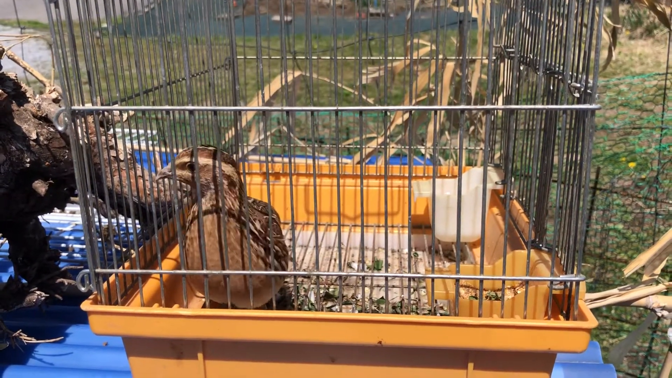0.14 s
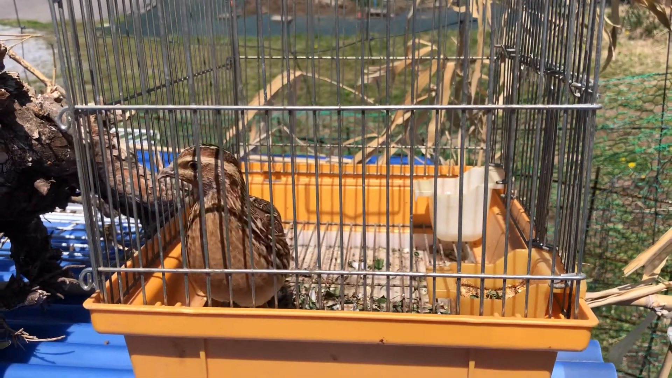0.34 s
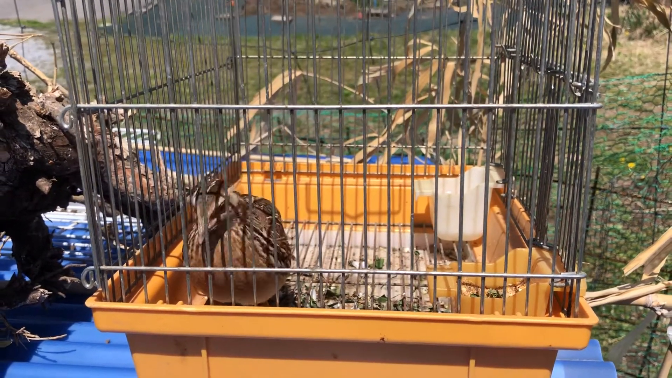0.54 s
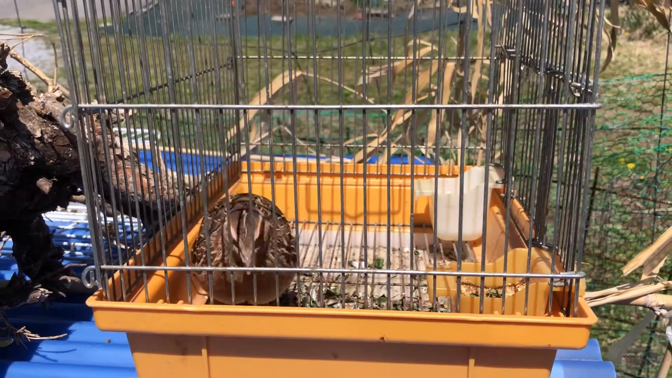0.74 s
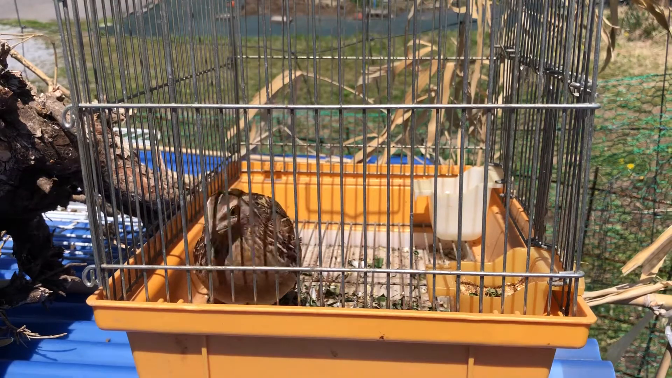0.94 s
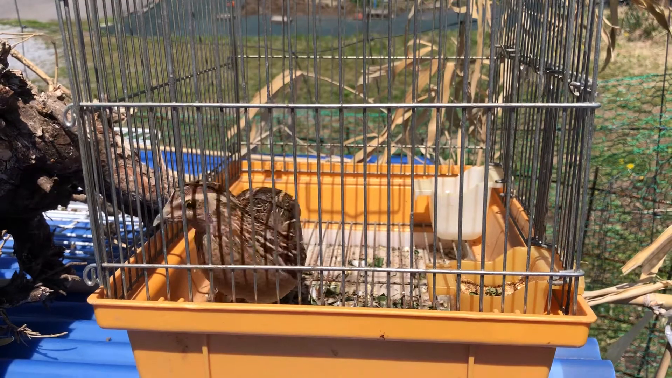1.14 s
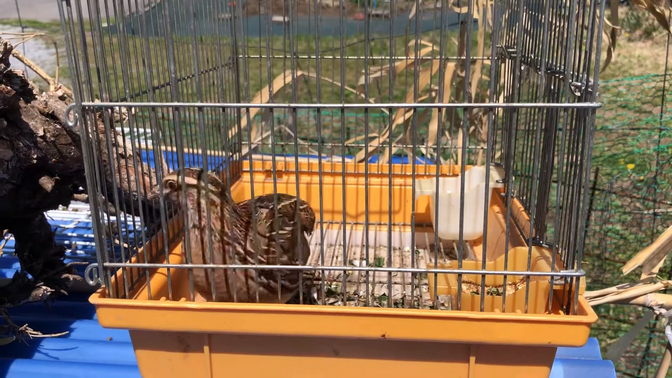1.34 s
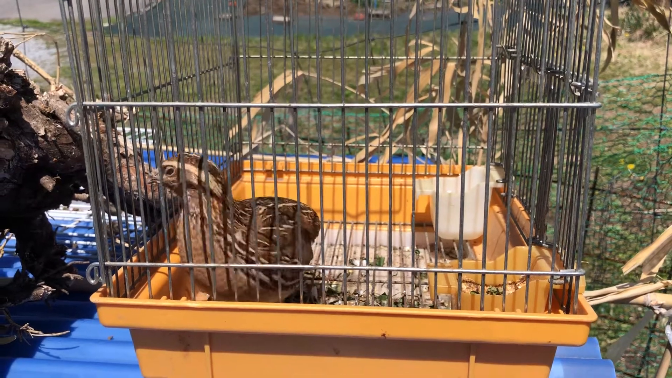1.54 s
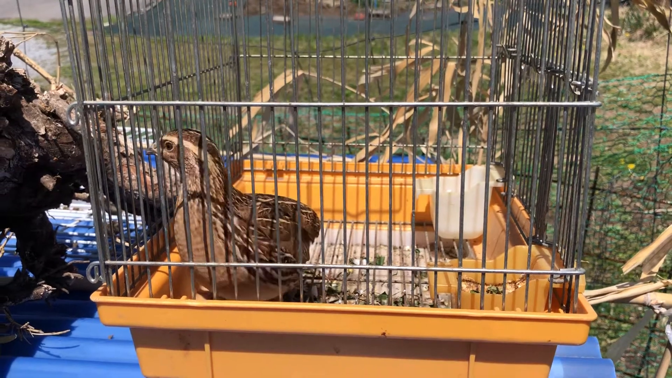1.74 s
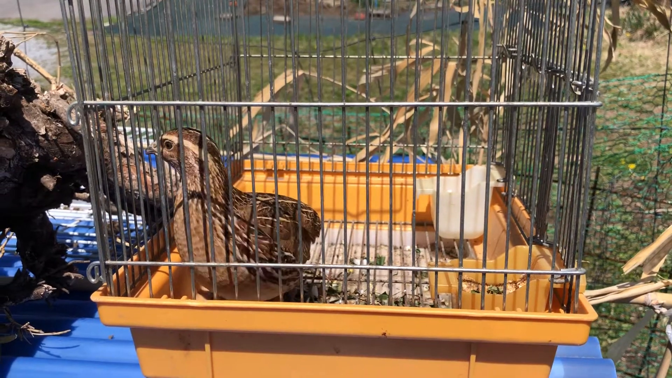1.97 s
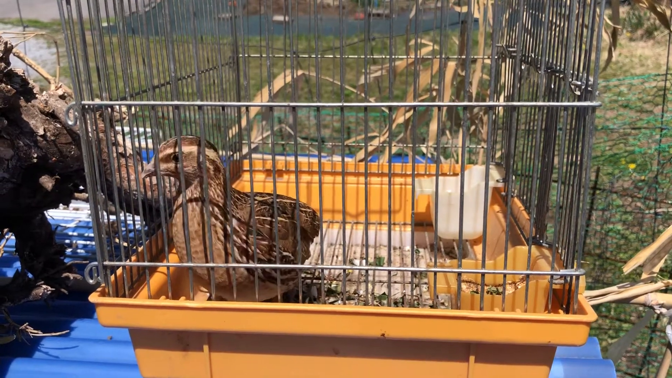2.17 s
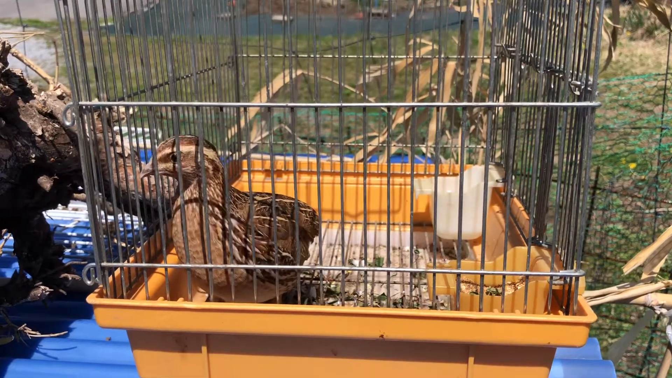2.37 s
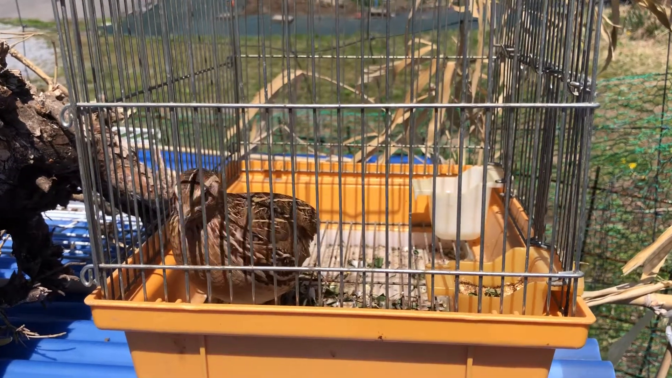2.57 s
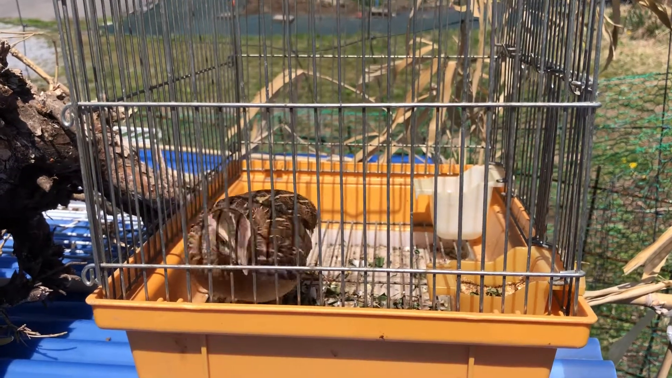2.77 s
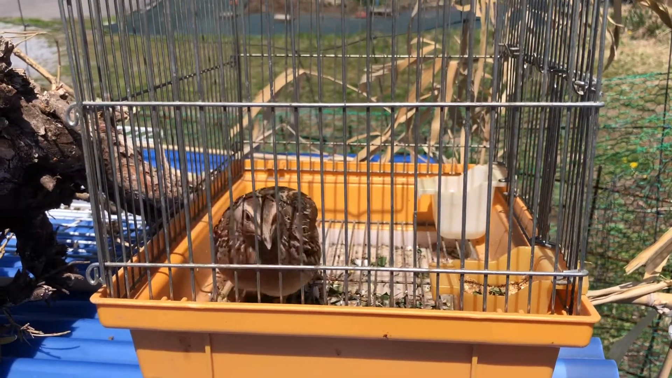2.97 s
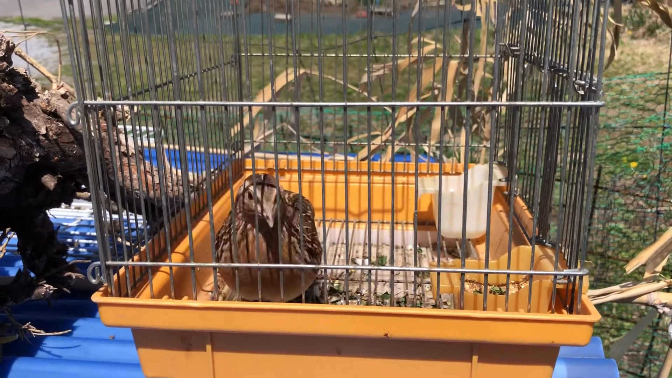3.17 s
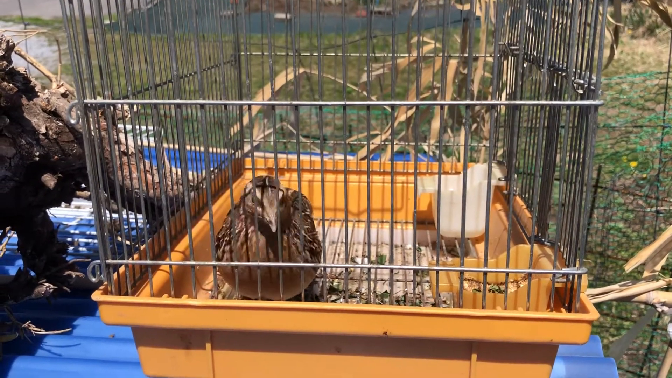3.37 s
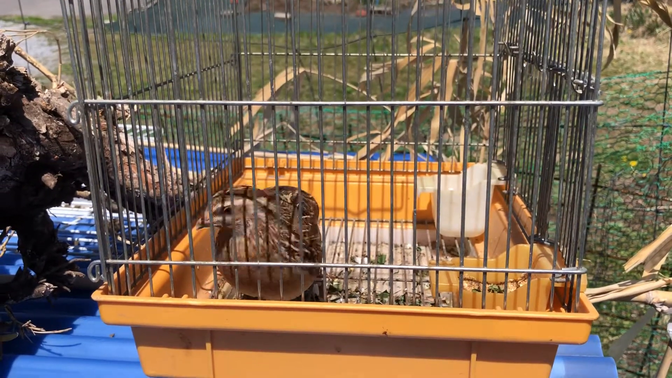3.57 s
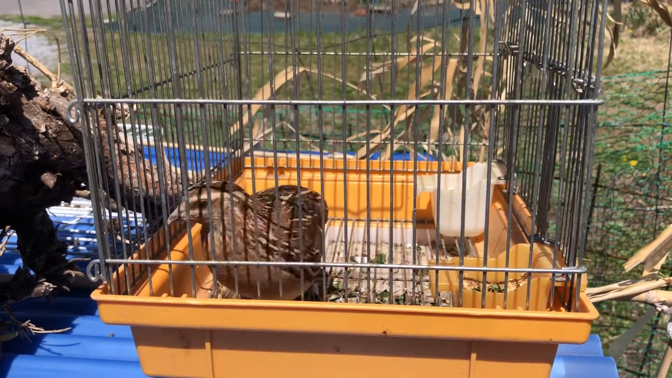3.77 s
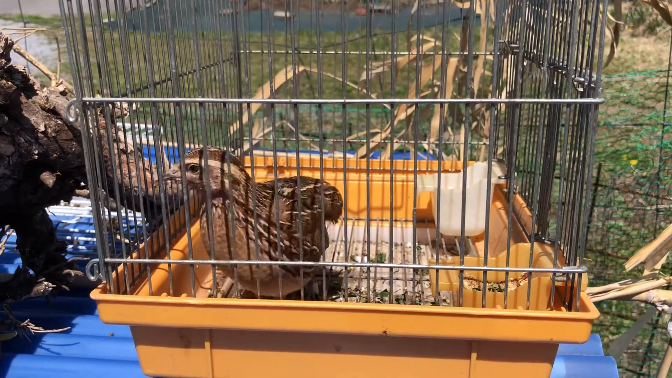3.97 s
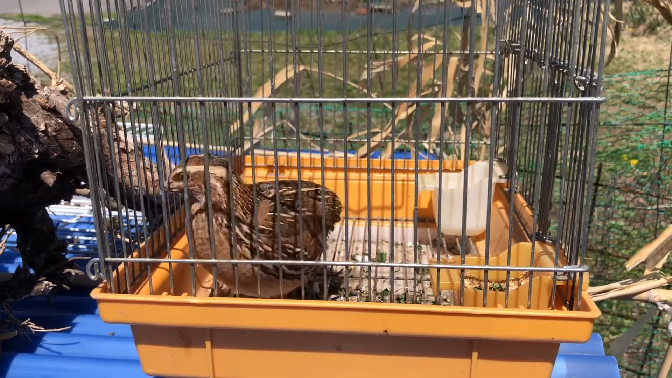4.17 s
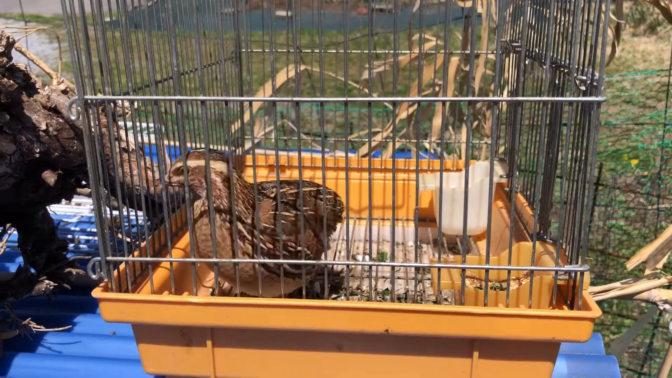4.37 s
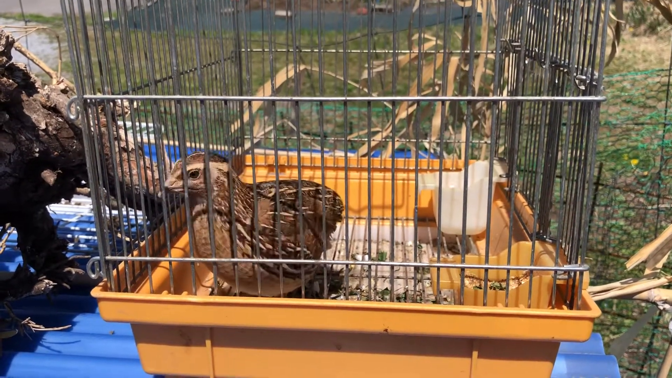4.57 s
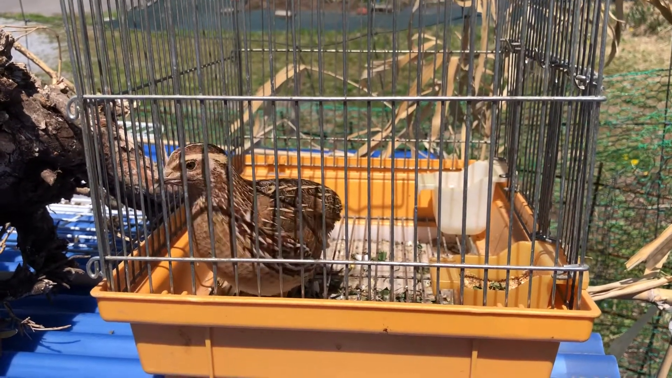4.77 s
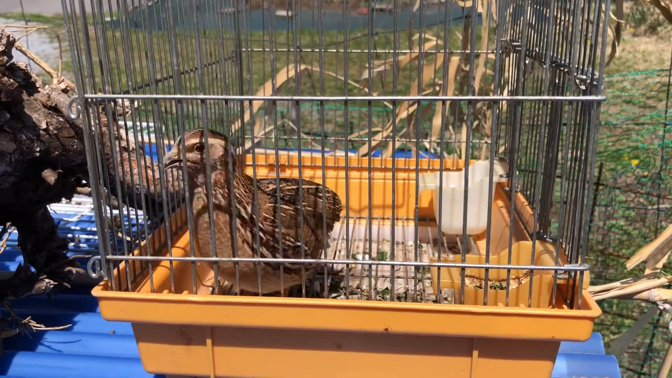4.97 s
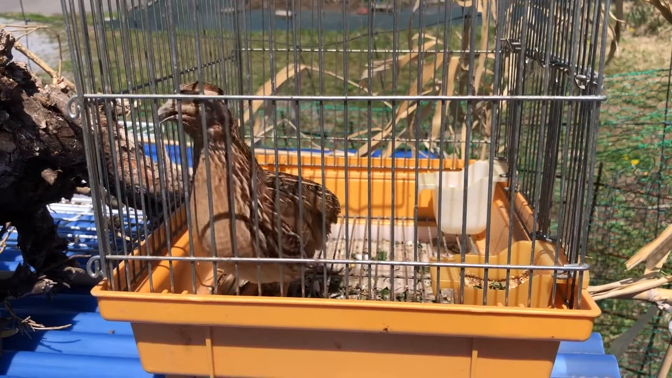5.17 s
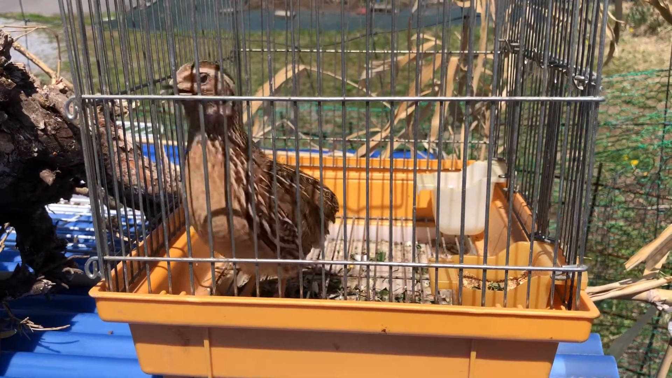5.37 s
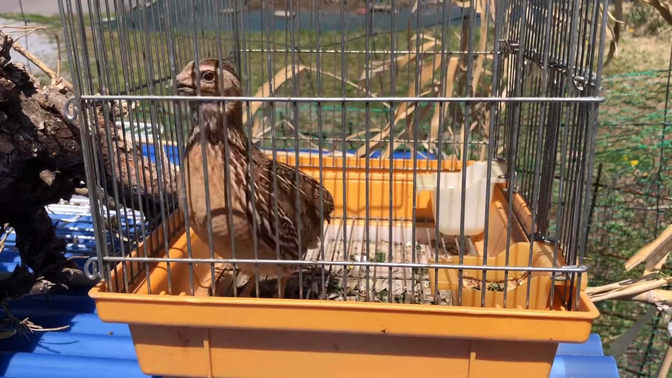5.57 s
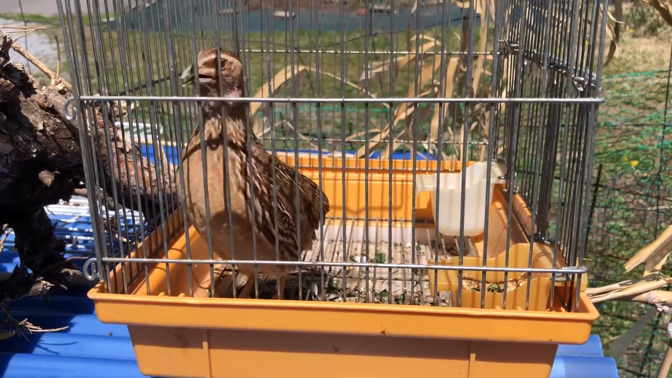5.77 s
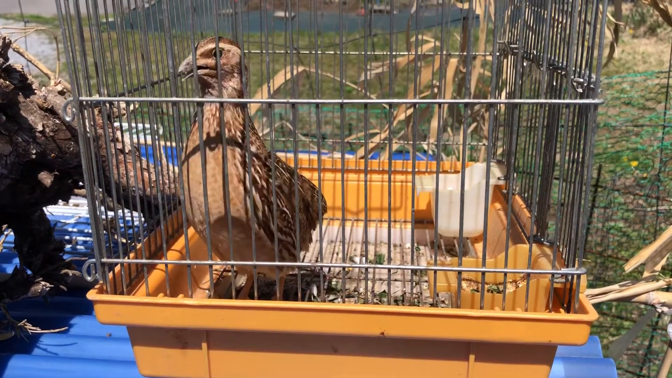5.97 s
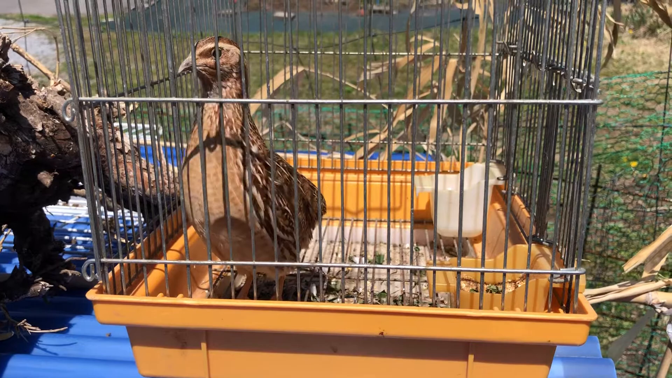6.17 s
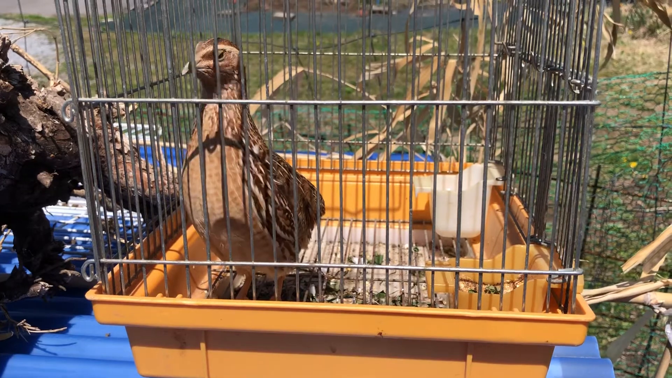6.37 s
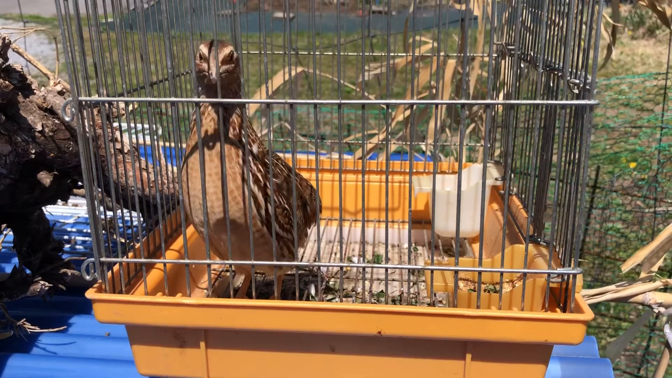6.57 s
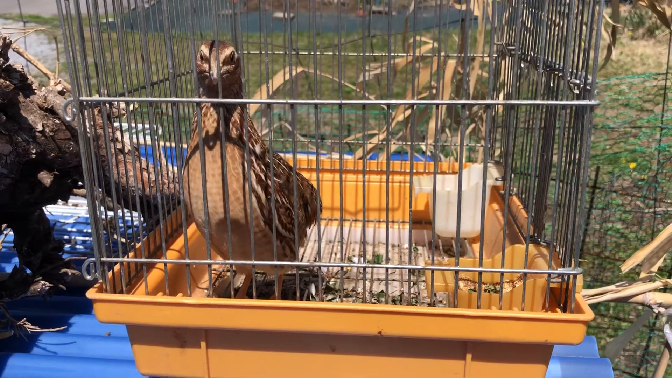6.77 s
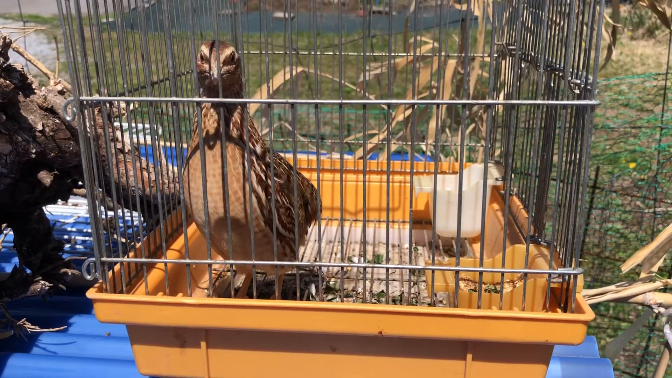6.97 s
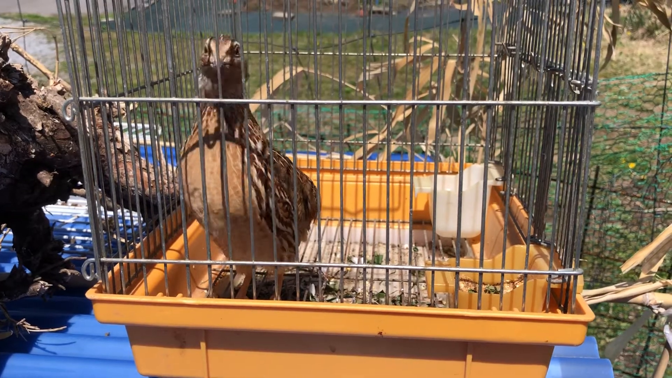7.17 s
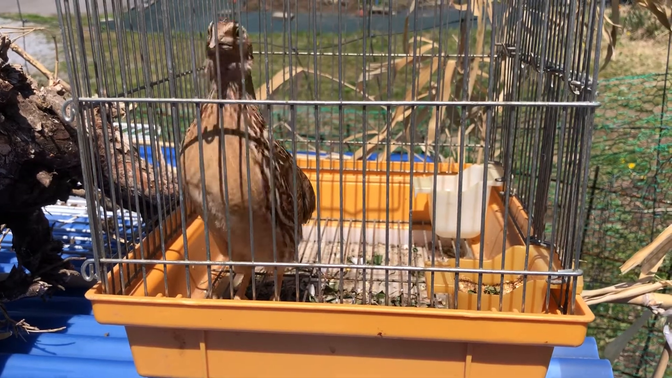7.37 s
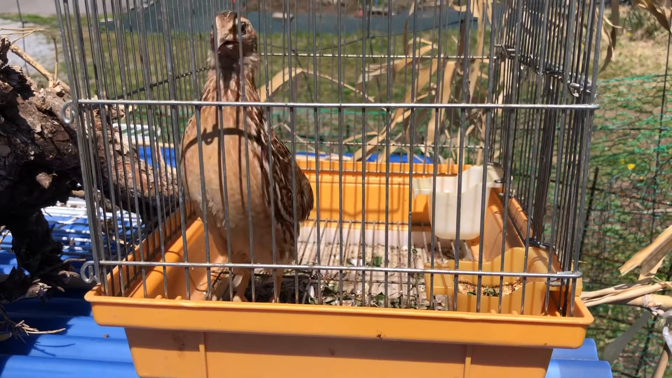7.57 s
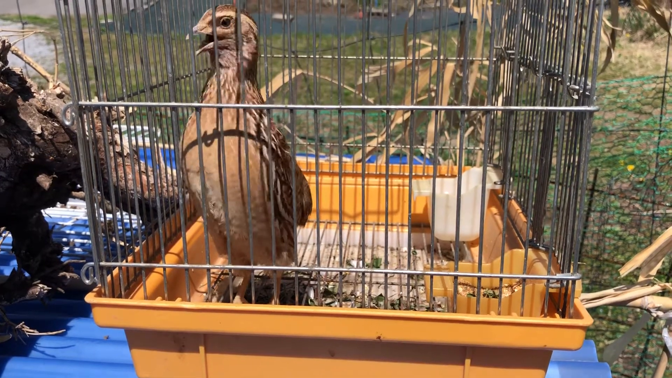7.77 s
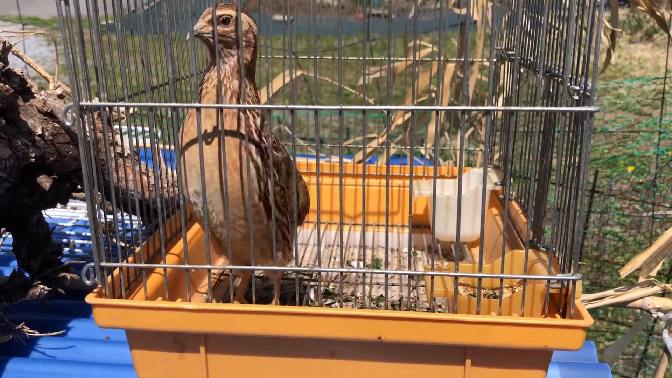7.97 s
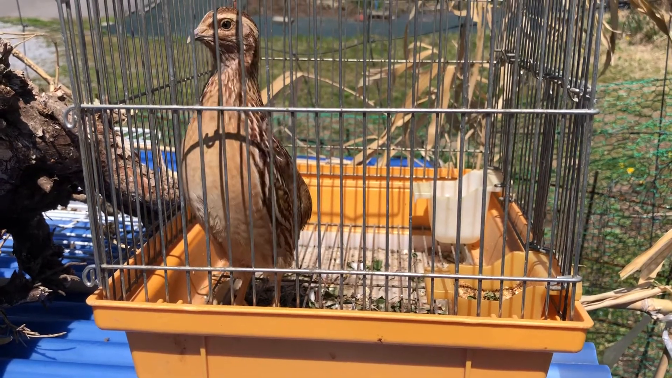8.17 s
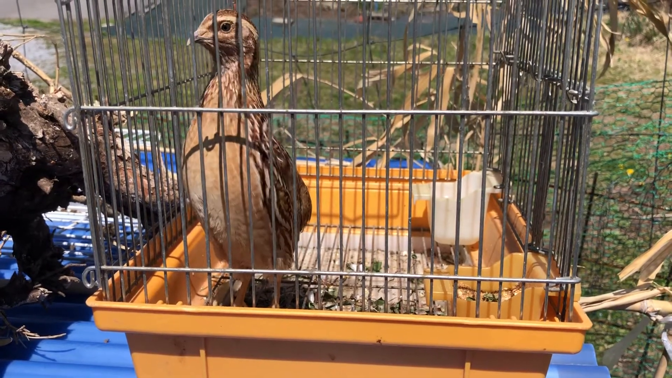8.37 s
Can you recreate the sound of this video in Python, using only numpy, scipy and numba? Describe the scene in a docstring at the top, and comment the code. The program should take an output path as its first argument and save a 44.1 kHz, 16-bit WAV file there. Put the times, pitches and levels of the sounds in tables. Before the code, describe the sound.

Close to the microphone outdoors, a male quail utters short, soft, upward-sliding peeps several times a second, while beak and claws make the cage wires chatter. After about five seconds it bursts into a loud harsh three-part crow with a fluttering last note, peeps twice, then crows again louder. Distant traffic rumbles low, and a far songbird whistles thinly.

```python
"""Outdoors at a cage, with a phone microphone an arm's length from a male quail.
Close: soft rising peeps made of sine partials, while beak and claws knock the wires into a chattering rattle.
Then two harsh three-part crows: syrinx puffs ring throat, beak and windpipe; a flapping beak trills the last part.
Far off: a songbird's thin whistles, and traffic built from bands of noise that swell and sink."""
import sys
import numpy as np
from scipy import signal
from scipy.fft import rfft, irfft
from scipy.io import wavfile
from scipy.ndimage import uniform_filter1d
from numba import njit

SR = 44100
rng = np.random.default_rng(int(sys.argv[2]) if len(sys.argv) > 2 else 0)


def invert_db(x):
    """Field ratio 10**(x/20) for x, a level in decibels (scalar or array-like)."""
    u = np.asarray(x, float) / 20
    return 10 ** u


def waveform_to_disk(signal):
    """Save audio, clipped to [-1, 1], as 16-bit WAV at the path in sys.argv[1]."""
    frames = np.transpose(np.atleast_2d(signal))
    scaled = np.clip(frames, -1, 1) * 32767
    samples = np.round(scaled).astype(np.int16)
    wavfile.write(sys.argv[1], SR, samples)


N = 371763
TIME = np.arange(N) / SR


def level(x, db):
    """Scale to an rms level."""
    return x * invert_db(db) / np.sqrt(np.mean(x ** 2))


def walk(rate):
    """Random levels held 1 / rate s and slewed; spread near 1."""
    hold = int(SR / rate)
    steps = np.repeat(rng.standard_normal(N // hold + 1), hold)
    return 1.3 * uniform_filter1d(uniform_filter1d(steps, hold), hold)[:N]


@njit
def svf(x, hz, width):
    """Band-pass whose centre may move, gain 1 at the centre."""
    y, b, l = np.empty(len(x)), 0., 0.
    for i in range(len(x)):
        g, k = np.tan(np.pi * hz[i] / SR), width / hz[i]
        v = (b + g * (x[i] - l)) / (1 + g * (g + k))
        b, l, y[i] = 2 * v - b, l + 2 * g * v, k * v
    return y


def steep(x, hz, width):
    """A resonance applied twice, with dark skirts."""
    centre = hz + np.zeros(len(x))
    return svf(svf(x, centre, 1. * width), centre, 1. * width)


def crow_gestures(syllables):
    """Syrinx and beak movements of one crow: sample times, their curves, and when breath flows."""
    # shape of each syllable: stage (0-1 lead, 1-2 body, 2-3 tail), pitch f/Hz, effort/dB,
    # roughness (0-1), beak cavity f/Hz
    first_shape = [(0, 1095, -26, .1, 2300), (1, 882.7, -2.5, .8, 2530), (2, 781.6, -2, .6, 2048),
                   (2.5, 525, -18, .15, 1750), (2.999, 515.8, -19.5, .12, 1436)]
    second_shape = [(0, 565.1, -23, .15, 1505), (.5, 640, -13.5, 0.32, 1878), (.8, 692.6, -12.5, .05, 1943),
                    (1, 891.7, -6.5, 0.78, 2300), (2, 890, -0.5, .65, 2550), (2.5, 953, -24, .4, 2164),
                    (3.001, 945.4, -49, .2, 2043)]
    trill_shape = [(0, 1148, -38.5, .15, 2300), (1, 886, -0.5, .7, 2200), (1.35, 891.4, -2.5, .8, 2300),
                   (1.652, 847.7, -1.5, .8, 2800), (1.8, 834, -1.5, .7, 3380), (1.998, 798, -3.5, .9, 3346),
                   (2.3, 730, -7, .95, 3000), (2.6, 694, -16.5, 0.55, 2170), (2.8, 588, -19, 0.29, 1970),
                   (3.001, 470, -48, .2, 1500)]
    rows = []
    for (s, lead, body, tail, db), shape in zip(syllables, (first_shape, second_shape, trill_shape)):
        clock = s - lead + np.cumsum([0, lead, body, tail])
        for stage, hz, effort, rough, beak in shape:
            moment = np.interp(stage, np.arange(len(clock)), clock)
            rows.append((moment, hz, db + effort, rough, beak))
    rows = np.array(rows)
    moments = rows[:, 0]
    t = TIME[int(moments[0] * SR):int((moments[-1] + .05) * SR)]
    curves = [np.interp(t, moments, c) for c in rows.T[1:]]
    # silent before the trill
    trill_row = len(first_shape + second_shape)
    in_trill = (t > moments[trill_row]) & (t < moments[-1])
    breath_out = (t < moments[trill_row - 1]) | in_trill
    return t, curves, breath_out


def add_whistles(t, hz, db, throat_hz, beak_hz, rough):
    """Clean whistles that swell into a harsh body take over the pitch, level and cavities."""
    # whistles: end t/s, length/s, start f/Hz, end f/Hz, end level/dB, throat f/Hz
    lead_whistles = [(5.44, .03, 1078, 1046, -32, 1950), (5.571, .016, 1153, 1231, -39, 1150),
                     (5.581, 0.01, 1030, 1105, -25, 1880), (5.792, .032, 1250, 1653, -31, 1590),
                     (7.29, .022, 1169, 1207, -24.5, 1880), (7.63, 0.019, 1296, 1480, -30.5, 1524)]
    beak, roughness, swell_db, edge_s = 2260, .1, 18, .003  # beak in Hz
    state = (hz, db, throat_hz, beak_hz, rough)
    for end, length, from_hz, to_hz, end_db, throat in lead_whistles:
        u = np.clip(1 + (t - end) / length, 0, 1)
        share = np.clip(np.minimum(t - end + length, end - t) / edge_s + .5, 0, 1)
        pitch = from_hz + (to_hz - from_hz) * u
        swell = end_db - swell_db * (1 - u) ** 2
        whistle = (pitch, swell, throat, beak, roughness)
        state = [old + share * (new - old) for old, new in zip(state, whistle)]
    return state


def flap_beak(t, beak_hz, db):
    """The beak snaps open and shut, moving its cavity resonance and the level."""
    # flaps: widest t/s, cavity f/Hz when open, added level/dB
    beak_flaps = [(5.592, 3390, -2), (5.801, 3770, -2.5), (5.843, 4286, -3.5), (5.884, 4350, -1),
                  (5.92, 3990, -3.5), (7.438, 3440, 1), (7.655, 3810, 0), (7.7, 4580, 3), (7.743, 4417, 2),
                  (7.784, 4750, -0.5), (7.823, 4134, 0), (7.872, 3870, -0.5)]
    flap_s = .037
    for s, open_hz, more_db in beak_flaps:
        gape = np.cos(np.pi * np.clip((t - s) / flap_s, -.5, .5)) ** 1.72
        beak_hz = beak_hz + (open_hz - beak_hz) * gape
        db = db + more_db * gape
    return beak_hz, db


@njit
def membrane(hz, rough, chance, jitter, scatter):
    """One puff a cycle; roughness makes the cycles uneven in length and size."""
    out, p, k = np.zeros(len(hz) + 8), 0., 0
    for i in range(len(hz)):
        step = hz[i] * np.exp(jitter * rough[i] * chance[k, 0]) / SR
        p += step
        if p >= 1:
            p, k = p - 1, k + 1
            size = 1 + scatter * rough[i] * chance[k, 1]
            for j in range(8):  # a windowed sinc sets the puff between samples
                u = j - 4 + p / step
                out[i + j] += size * np.sinc(u) * (1 + np.cos(np.pi * u / 4)) / 2
    return out[4:len(hz) + 4]


def vocal_tract(source, hz, db, rough, throat_hz, beak_hz):
    """Chest, throat, moving beak cavity and windpipe ring in parallel; side cavities cut gaps."""
    # fixed windpipe resonances: f/Hz, width/Hz, relative level/dB
    pipe_modes = [(3500, 800, -16), (5250, 500, -18), (7400, 1500, -32), (8300, 1300, -35),
                  (11800, 3000, -43), (14600, 3000, -43)]
    # side-cavity gaps: f/Hz, width/Hz
    side_gaps = [(1060, 95), (2720, 98), (4520, 280), (5800, 180)]
    openness = 2.17 * np.tanh((beak_hz - 2500) / 1400)  # a wider gape lets more treble out, up to a point
    mellow_db = -18 * (1 - rough) ** 3  # clean notes carry few overtones
    upper_hz = np.minimum(beak_hz + 1100, 5300)  # the second beak mode stops at a ceiling
    chest_db = -3 - .5 * (db + 23)  # the chest hum fades more slowly than the cry
    sound = invert_db(chest_db) * steep(source, np.minimum(hz, 900), 230)
    sound += invert_db(16.5) * steep(source, throat_hz, 570)
    sound -= invert_db(15.5 + 4.2 * openness) * steep(source, beak_hz, 550)
    sound += invert_db(1.0 + 3.1 * openness + mellow_db) * steep(source, upper_hz, 980)
    for f, width, pipe_db in pipe_modes:
        gain_db = 6.5 + pipe_db + 10.8 * openness + mellow_db + 0.25 * (db + 27)
        sound += invert_db(gain_db) * steep(source, f, width)
    # the cry swells where the beak cavity crosses the windpipe
    sound += 0.19 * steep(sound, 3406, 490)
    for gap_hz, width in side_gaps:
        sound -= 0.65 * svf(sound, gap_hz + np.zeros(len(sound)), 1. * width)
    return sound


def crow(syllables):
    """Syrinx puffs and breath noise drive the vocal tract through three syllables."""
    t, (hz, db, rough, beak_hz), breath_out = crow_gestures(syllables)
    throat_hz = 640 + 1.292 * hz  # the throat rises with the pitch
    hz, db, throat_hz, beak_hz, rough = add_whistles(t, hz, db, throat_hz, beak_hz, rough)
    rough = np.clip(rough, 0, 1)
    beak_hz, db = flap_beak(t, beak_hz, db)
    # in harsh stretches the cavities quiver, which breaks their bands into grains
    throat_hz = throat_hz * (1 + .06 * rough * walk(500)[:len(t)])
    beak_hz = beak_hz * (1 + .06 * rough * walk(500)[:len(t)])
    chance = rng.uniform(-1.3, 1, (len(t) // 8, 2))
    puffs = membrane(hz, rough, chance, .4, 0.43) * np.sqrt(SR / hz)
    breath = .5 * rough * rng.standard_normal(len(t))
    source = (puffs + breath) * invert_db(db) * breath_out
    sound = vocal_tract(source, hz, db, rough, throat_hz, beak_hz)
    start = int(round(t[0] * SR))
    return np.pad(sound, (start, N - start - len(t)))


def peeps():
    """Clean notes that slide up and level off, swell and stop short."""
    # peeps: end t/s, nominal pitch f/Hz, relative level/dB, added overtone level/dB
    peep_notes = [(0.063, 1363, -44, 3.5), (.233, 1350, -48, 4), (.437, 1350, -45.5, 1),
                  (0.561, 1475, -45, -1), (.687, 1620, -48, 0.5), (.879, 1530, -45.5, 1),
                  (1.063, 1344, -46, 3), (1.258, 1430, -47, 4.5), (1.589, 1315, -55.5, 6),
                  (1.81, 1410, -52.5, 3.5), (2.04, 1320, -49.5, -2), (2.223, 1390, -46, -2),
                  (2.548, 1337, -50.5, -5), (2.754, 1453, -47.5, -8), (2.894, 1540, -49, 6),
                  (3.039, 1546, -45.5, 2.5), (3.394, 1366, -48.5, -6), (3.548, 1504, -45.5, -0.5),
                  (3.709, 1513, -44, -2), (3.876, 1424, -44.5, 3), (4.127, 1385, -46.5, .6),
                  (4.286, 1390, -46.5, 2.5), (4.647, 1310, -51.5, 3), (6.434, 1447, -39.5, -19),
                  (6.735, 1453, -41, -16), (8.272, 1646, -59.5, -3)]
    out, u = np.zeros(N), np.linspace(0, 1, int(.033 * SR))
    for end, pitch_hz, db, overtones_db in peep_notes:
        phase = 2 * np.pi * np.cumsum(pitch_hz * (1.03 - .4 * (1 - u) ** 2.1)) / SR
        phase += .012 * np.cumsum(rng.standard_normal(len(u)))  # a slight waver blurs the high partials
        second_db, third_db = -13.5 + overtones_db, -26 + overtones_db
        # a side cavity weakens the second partial of low peeps
        second_db += -8 * np.exp(-((2 * pitch_hz - 2703) / 71) ** 2)
        partials = [(0, 1.4), (second_db, 1.6), (third_db, .7)]  # (dB, swell exponent)
        partials += [(third_db - 21 + .9 * k, .9) for k in range(8)]
        note = np.zeros(len(u))
        for number, (gain_db, swell) in enumerate(partials, 1):
            if number * pitch_hz < 15500:
                note += invert_db(gain_db) * np.sin(number * phase) * u ** swell
        i = int((end + 0.0012) * SR) - len(u)
        stop = np.clip((1 - u) / 0.18, 0, 1)
        out[i:i + len(u)] += np.sqrt(2) * invert_db(db + 3.0) * note * stop
    return out


def knocks():
    """A blow sets loose wires chattering: dense small re-hits, each a scratch that faintly rings the wires."""
    # beak and claws on the cage: t/s, relative level/dB, nominal ring time/s
    cage_blows = [(.9003, -63.5, .035), (1.0934, -63, .03), (1.1243, -60, .03), (1.186, -60, 0.32),
                  (1.2134, -45, 0.28), (1.31, -53.5, 0.41), (1.351, -56.5, 0.2), (2.0457, -59.5, .03),
                  (2.2373, -57, 0.033), (2.893, -50.5, .03), (2.961, -54, 0.035), (3.01, -53, 0.19),
                  (3.0609, -62.5, .02), (3.084, -45.5, 0.23), (3.991, -57, 0.55), (4.019, -48, 0.14),
                  (4.0941, -58.5, .05), (4.2243, -58, 0.34), (4.26, -63, 0.24), (4.5524, -64.5, 0.035),
                  (6.295, -61, 0.045), (7.531, -60, 0.068), (8.27, -63.5, .03)]
    # cage wire modes: f/Hz, relative level/dB, share of the ring time
    wire_modes = [(2820, 2, 0.65), (3400, 2, 0.54), (5410, 0.5, 0.66), (6150, -8, .66), (7600, -20, .86),
                  (8850, -22, .8), (10000, -17, 0.68), (11900, -22, 1.4), (12400, -22, 1), (13300, -7, .75),
                  (14050, -16, 0.52)]
    out, t = np.zeros(N + 2 * SR), TIME[:SR // 2]
    for s, db, ring_s in cage_blows:
        struck = rng.random(len(t)) < 900 / SR  # about 900 re-hits a second
        hits = rng.standard_normal(len(t)) * struck * .32 * invert_db(-60 * t / (1.2 * ring_s))
        hits[0] = 1 / (1 + ring_s / .2)  # long rattles start softer
        hiss = svf(rng.standard_normal(len(t)), 8000 + 0 * t, 13000.0)
        scratch = hiss * invert_db(-60 * t / 0.022)
        ring = np.zeros(len(t))
        for f, gain_db, share in wire_modes:
            detune, turn = rng.standard_normal(2)
            decay = invert_db(gain_db - 19 - 60 * t / (share * .7 * ring_s))
            ring += decay * np.sin(2 * np.pi * f * (1 + .015 * detune) * t + 3 * turn)
        blow = signal.fftconvolve(hits, (1.33 * scratch + ring) * np.clip(t / .002, 0, 1))
        i = int(s * SR)
        out[i:i + len(blow)] += invert_db(db) * blow
    return out[:N]


def songbird():
    """Thin wavering whistles, blurred by distance."""
    # chirps: start t/s, length/s, start f/Hz, end f/Hz, relative level/dB
    far_chirps = [(3.14, .07, 3950, 4200, -65), (3.43, .07, 3950, 4150, -66), (3.65, .11, 3950, 4400, -65),
                  (3.92, .09, 4300, 5500, -71), (4.41, .05, 3800, 4000, -69), (4.99, .08, 3750, 4000, -69),
                  (5.53, .025, 4550, 4500, -63)]
    out = np.zeros(N)
    for s, length, from_hz, to_hz, db in far_chirps:
        u = np.linspace(0, 1, int(length * SR))
        phase = 2 * np.pi * np.cumsum(from_hz + (to_hz - from_hz) * u) / SR
        out[int(s * SR):][:len(u)] += invert_db(db) * np.sin(np.pi * u) * np.sin(phase)
    tail = rng.standard_normal(SR // 4) * invert_db(-60 * TIME[:SR // 4] / .3)
    blurred = signal.fftconvolve(out, level(tail, -44.0))[:N]
    return .5 * out * walk(250) + blurred


def coloured(points, lo_hz, hi_hz):
    """Noise with a (Hz, dB) spectrum, faded out beyond two edges."""
    hz, db = np.transpose(points)
    f = np.arange(N // 2 + 1) * SR / N + 1
    fades = 1 / np.sqrt((1 + (lo_hz / f) ** 12) * (1 + (f / hi_hz) ** 12))
    shape = invert_db(np.interp(np.log(f), np.log(hz), db)) * fades
    return irfft(rfft(rng.standard_normal(N)) * shape, N)


def traffic():
    """Far traffic as noise bands: a deep low hum, rumble, drone and tyre roar, with a narrow wavering whine."""
    # level curves before flutter: t/s, tyre roar/dB, rumble/dB, whine/dB
    road_levels = [(.1, -51.5, -49, -53.5), (.45, -51.5, -47, -62), (.9, -57, -46, -66),
                   (1.25, -56.5, -53.5, -84), (1.65, -53, -48.5, -53), (2.1, -55, -50.5, -61),
                   (2.7, -54.5, -50.5, -56), (3.1, -54, -51, -60.5), (3.6, -56, -53, -69),
                   (4.0, -51.5, -55, -71), (4.4, -57, -53, -81), (5.0, -54.5, -49, -64.5),
                   (5.6, -55.5, -52.5, -56), (6.3, -54.5, -47, -54), (6.7, -56.5, -44.5, -59.5),
                   (7.15, -59, -51.5, -69.5), (7.9, -58, -52.5, -61.5), (8.4, -59.5, -59, -70)]
    # spectrum of distant traffic: f/Hz, relative level per Hz/dB
    far_spectrum = [(45, 1.5), (75, -2.5), (150, 5.5), (218, -8), (306, -3.5), (389, -14.5), (604, -14),
                    (816, -13), (1000, -17.5), (1300, -19.5), (3000, -46), (3900, -61.5)]
    s, *curves = np.transpose(road_levels)
    roar_db, rumble_db, whine_db = (np.interp(TIME, s, c) for c in curves)
    deep_db = -51 - 1.07 * np.abs(TIME - 2.2)  # strongest at 2.2 s
    drone_db = (roar_db + rumble_db) / 2 - 0.5  # follows roar and rumble
    deep, rumble, drone, roar = (coloured(far_spectrum, lo, hi) for lo, hi in
                                 [(44, 90), (90, 210), (210, 480), (480, 4000)])  # Hz
    whine = steep(rng.standard_normal(N), 702 + 8 * walk(1.5), 45)
    out = np.zeros(N)
    for noise, db in ((deep, deep_db), (rumble, rumble_db), (drone, drone_db),
                      (roar, roar_db), (whine, whine_db)):
        flutter_db = .6 * walk(8.7) + 1.2 * walk(2.538)
        out += level(noise, 0) * invert_db(db + flutter_db)
    return out


def air():
    """A nearly steady hiss of shaped noise behind everything."""
    # hiss spectrum: f/Hz, relative level per Hz/dB
    air_spectrum = [(1290, -26.5), (2200, 0.5), (2790, -6.5), (3750, -4.5), (5290, -9), (15100, -17),
                    (15600, -17)]
    return level(coloured(air_spectrum, 2000, 18000), -75) * invert_db(0.372 * walk(5.7))


def scene():
    """The quail with a short outdoor scatter from cage and plants, over the distant sounds."""
    # each crow, syllable by syllable: body start t/s, lead/s, body/s, tail/s, reference level/dB
    crow_syllables = [
        [(5.444, .032, 0.04, 0.047, -33.5), (5.588, .056, .014, .016, -31.5), (5.793, 0.039, 0.18, .155, -28)],
        [(7.292, .023, 0.05, 0.035, -26), (7.424, .04, .023, .019, -23), (7.635, .025, 0.26, .115, -23)],
    ]
    quail = sum(crow(syllables) for syllables in crow_syllables) + peeps()
    scatter = np.diff(rng.standard_normal(SR // 3 + 1)) * invert_db(-60 * TIME[:SR // 3] / 0.9)
    echo = signal.fftconvolve(quail, level(scatter, -74.5))[:N]
    return (quail + echo + knocks() + songbird() + traffic() + air())[None]


def roll_off(x):
    """The treble ends steeply here."""
    return signal.sosfilt(signal.butter(12, 15760, fs=SR, output="sos"), x)


def record(dry):
    """The phone microphone rounds the loudest peaks."""
    ceiling = .65  # of full scale
    mix = ceiling * np.tanh(dry / ceiling)
    return roll_off(mix)


dry = scene()
out = record(dry)
waveform_to_disk(out)
```